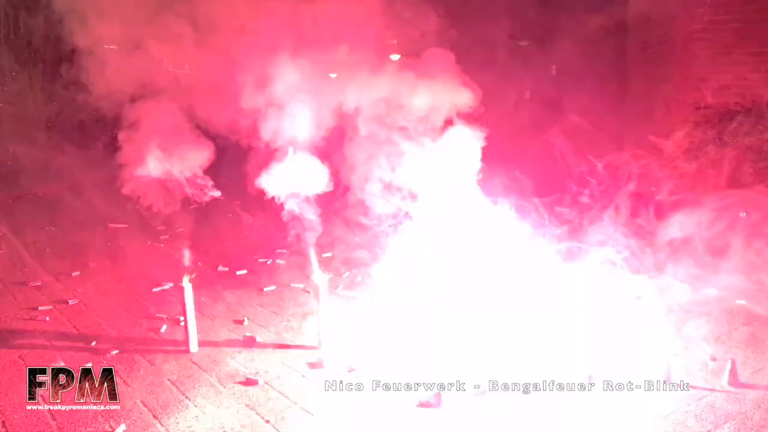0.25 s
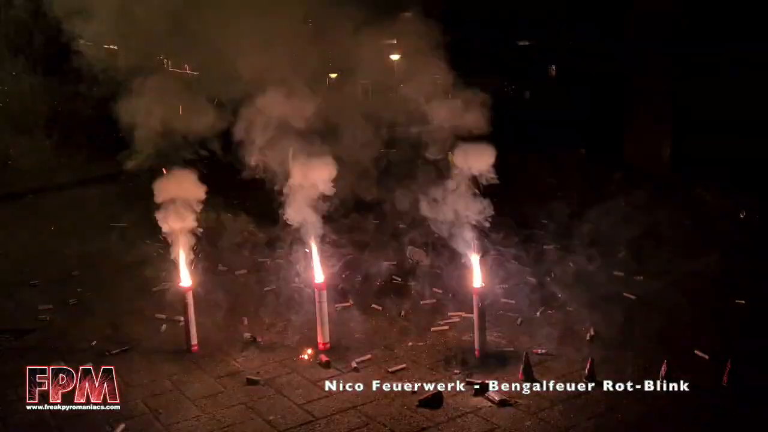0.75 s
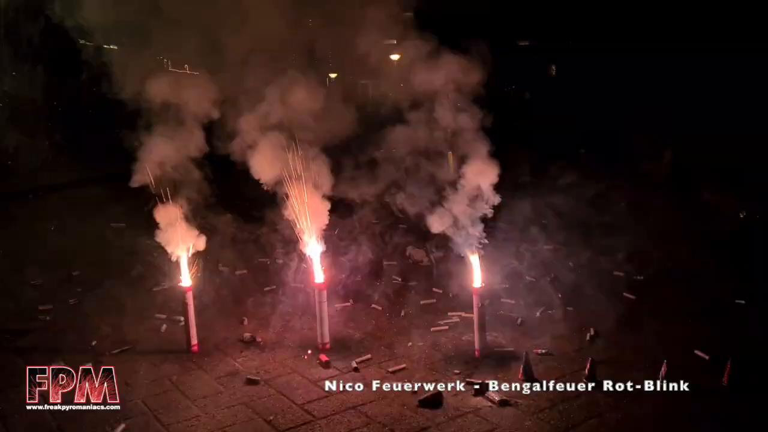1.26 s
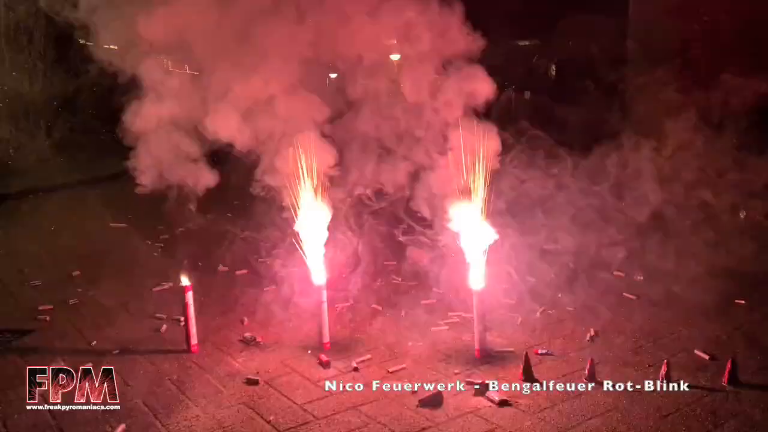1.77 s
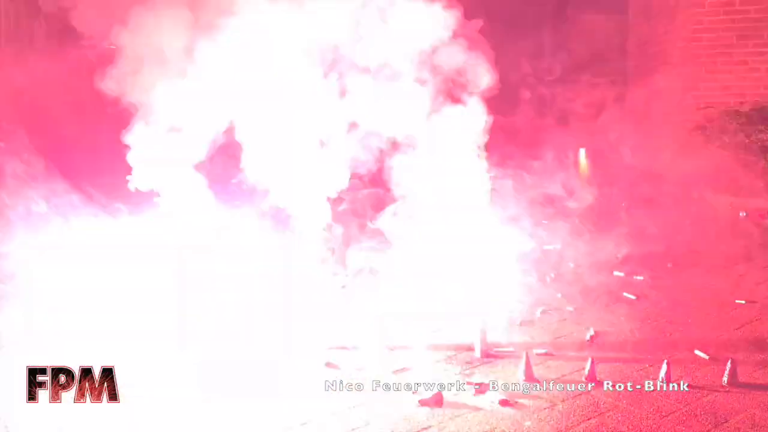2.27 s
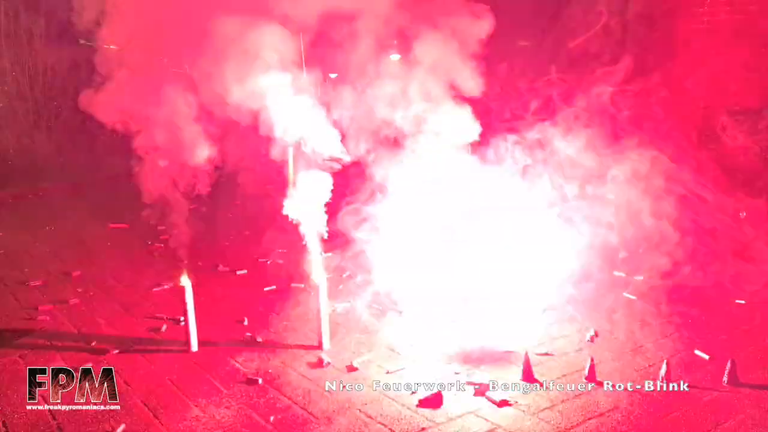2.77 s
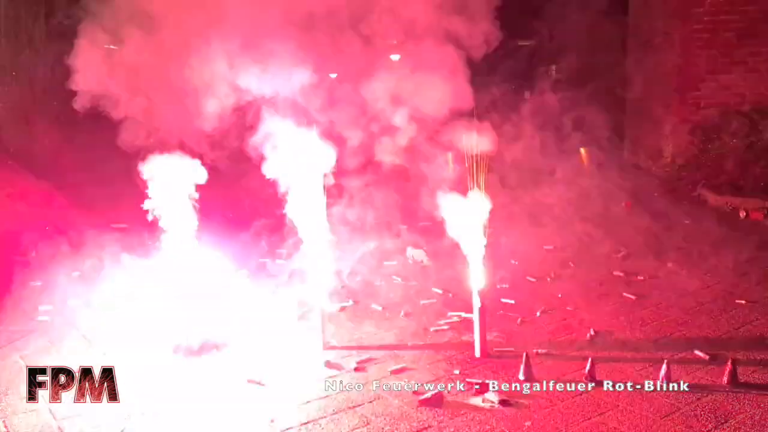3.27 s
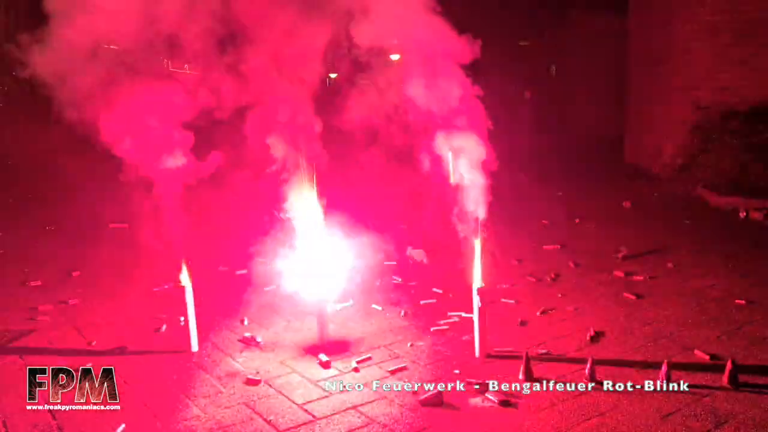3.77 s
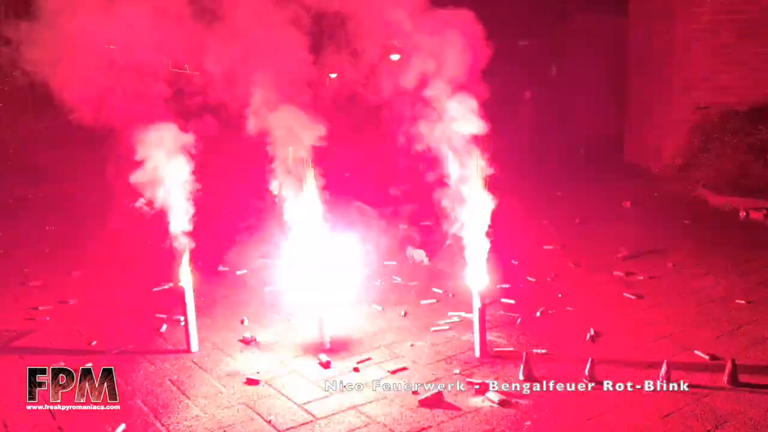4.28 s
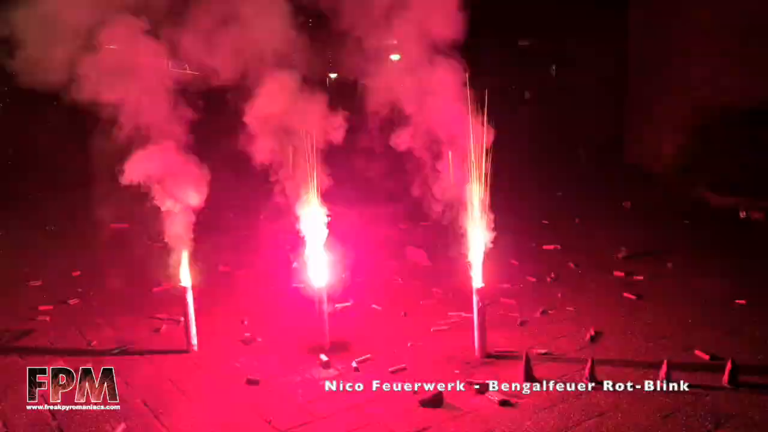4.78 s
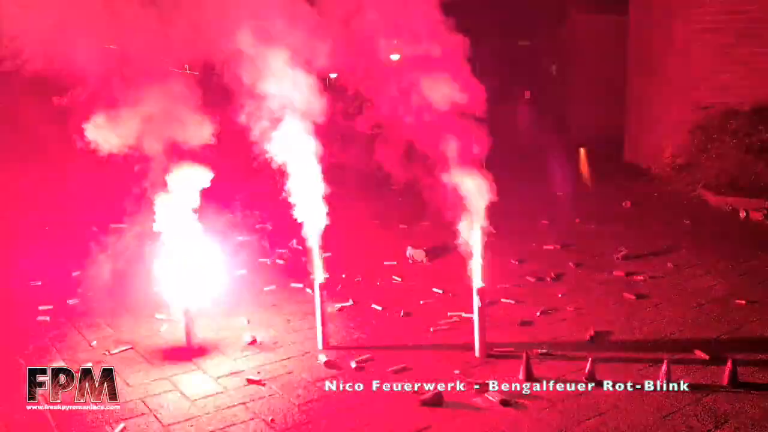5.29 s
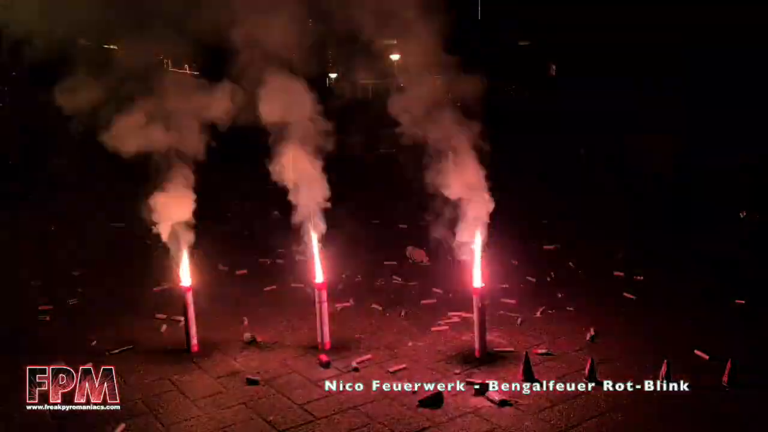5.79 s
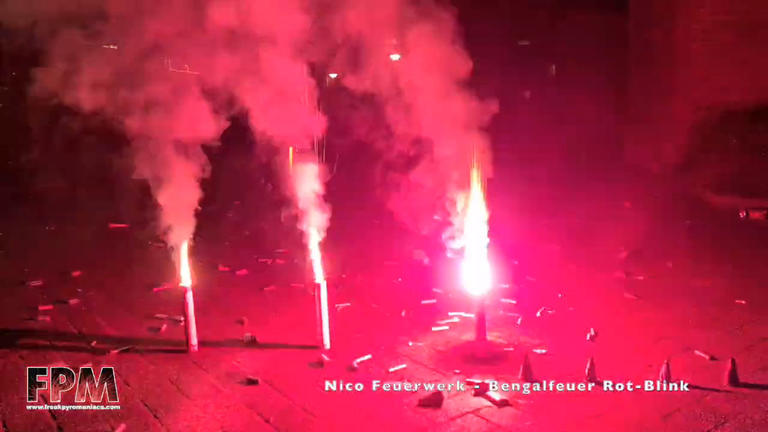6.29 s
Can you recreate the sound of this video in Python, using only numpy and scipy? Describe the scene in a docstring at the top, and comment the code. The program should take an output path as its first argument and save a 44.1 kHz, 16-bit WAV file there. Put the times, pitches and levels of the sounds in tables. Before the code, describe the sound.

Three flares sputter and crackle in a paved yard, flashing in rapid, irregular bright fizzing whooshes while distant fireworks boom over low rumble.

```python
"""A paved yard at night: three strobe flares burn side by side a few metres from a stereo microphone.
Each smoulders with a faint sputter and crackle, made of noise with wavering level and of short noise ticks.
Two to four times a second each flashes: roar, hiss and spark-filled fizz swell briefly, with a puff of air.
The sound bounces off the paving and dies quickly in the yard; soft thuds are low noise bursts.
Distant fireworks boom as narrow noise bands with echoes, over a low town rumble of coloured noise."""
import sys
import numpy as np
from scipy import signal
from scipy.fft import rfft, irfft, next_fast_len
from scipy.io import wavfile
from scipy.ndimage import uniform_filter1d

SR = 44100
rng = np.random.default_rng(int(sys.argv[2]) if len(sys.argv) > 2 else 0)


def waveform_to_disk(signal):
    """Save audio, clipped to [-1, 1], as 16-bit WAV at the path in sys.argv[1]."""
    frames = np.transpose(np.atleast_2d(signal))
    scaled = np.clip(frames, -1, 1) * 32767
    samples = np.round(scaled).astype(np.int16)
    wavfile.write(sys.argv[1], SR, samples)


N = 288414
TIME = np.arange(N) / SR
SIZE = next_fast_len(N + SR // 2)
FREQ = np.arange(SIZE // 2 + 1) * SR / SIZE
MIRROR = np.array([[1], [-1]])  # left, right
FADE_S = 0.015  # every flash dies away equally fast


def undb(db):
    """Decibels to gain."""
    return 10 ** (np.asarray(db) / 20)


def unit(x):
    """Scale to rms 1."""
    return x / np.sqrt(np.mean(x ** 2))


def curve(rows):
    """Rows (s, value) joined by straight lines over time."""
    return np.interp(TIME, *np.transpose(rows))


def spectrum(points):
    """Rows (Hz, dB) joined on a log-frequency axis."""
    hz, db = np.transpose(points)
    return np.interp(np.log(FREQ + 1), np.log(hz), db)


def shape(x, response):
    """Filter with a frequency response."""
    return irfft(rfft(x, SIZE) * response, SIZE)[..., :N]


def colour(x, points):
    """Give a sound a spectrum that runs to low levels outside its points; rms 1."""
    below = (points[0][0] / 2, -60)
    above = (points[-1][0] * 2, -70)
    return unit(shape(x, undb(spectrum([below] + list(points) + [above]))))


def walk(rate_hz):
    """Smooth random signal, rms 1, with a Gaussian lowpass at rate_hz."""
    return unit(shape(rng.standard_normal(N), np.exp(-(FREQ / rate_hz) ** 2)))


def sparks(rate_hz, spread_db):
    """Single-sample cracks at random moments, some louder than the rest; rms 1."""
    size = undb(spread_db * np.minimum(rng.exponential(size=N), 2.5))
    hit = rng.random(N) < rate_hz / SR
    return unit(hit * size * np.sign(rng.standard_normal(N)))


def diffuse(mid, side, wide_hz):
    """Far sound: the bass is alike at both ports, the treble is not."""
    return mid + shape(side, FREQ / np.hypot(FREQ, wide_hz)) * MIRROR


def town(waver_db=0.5, waver_hz=5.7):
    """Low town rumble: coloured noise, swelling around the loudest bang."""
    # rumble spectrum: (frequency [Hz], level [dB])
    rumble_points = [(20, 9), (40, -10), (70, 9), (120, 1.5), (250, -1.5), (450, -3.5), (640, -7),
                     (1000, -17.5), (2000, -26), (6000, -68)]
    # rumble level: (time [s], level [dB])
    level_rows = [(0, -44), (1.4, -49), (2.5, -54), (3.9, -47.5), (4.5, -42.5), (6.5, -46)]
    level = undb(curve(level_rows) + waver_db * walk(waver_hz))
    mid, side = colour(rng.standard_normal((2, N)), rumble_points) * level
    return diffuse(mid, side, wide_hz=875)


def booms(rise_s=0.0021, cycles=3.1, usual_hz=200, width_share=1.09, width_growth=0.24,
          echo_db=-17, echo_s=0.25, echo_growth=0.62, crack_db=-15, crack_hz=640):
    """Far bangs smeared by the streets: deep ones are narrower and echo longer, bright ones keep some crack."""
    # distant fireworks: (start [s], level [dB], centre frequency [Hz])
    bangs = [(.076, -35, 700), (0.485, -28.5, 63.6), (.553, -25.5, 66.4), (.677, -26, 56.3),
             (.718, -30, 62.4), (0.811, -28, 71.4), (.96, -34.5, 69.5), (1.11, -37.5, 70),
             (2.749, -35.5, 218), (2.819, -35, 270), (3.503, -30, 400), (3.54, -31, 450),
             (3.978, -25.5, 193), (4.005, -23, 218), (4.022, -21, 420), (4.044, -17.5, 433),
             (4.092, -22, 241), (4.113, -18.5, 182), (4.172, -28, 346)]
    out, age = np.zeros((2, N)), TIME[:SR]
    crack_edges = [crack_hz / 2, crack_hz * np.sqrt(2)]
    crack_band = signal.butter(2, crack_edges, "band", fs=SR, output="sos")
    for start, db, hz in bangs:
        pitch = hz / usual_hz
        width_hz = hz * width_share * pitch ** width_growth
        edges = np.hypot(hz, width_hz / 2) + np.array([-width_hz, width_hz]) / 2
        band = signal.butter(2, edges, "band", fs=SR, output="sos")
        wave = signal.hilbert(signal.sosfilt(band, rng.standard_normal((2, 2 * SR))))
        even = wave.real / abs(wave)  # one pressure front: its strength is even
        rumble = unit(signal.sosfilt(band, even)[:, SR:])
        crack = unit(signal.sosfilt(crack_band, rng.standard_normal((2, SR))))
        crack *= undb(crack_db) * min(pitch, 1) ** 2
        echoes = undb(echo_db) * np.exp(-age / echo_s * pitch ** echo_growth)
        swell = (1 - np.exp(-age / rise_s)) * (np.exp(-age * hz / cycles) + echoes)
        first = int(start * SR)
        out[:, first:first + SR] += undb(db) * (rumble + crack) * swell
    return diffuse(*out, wide_hz=750)


def crackle(crackle_db=-57, decay_s=0.0011):
    """Glowing slag cracks about a dozen times a second, each time a dry tick of a few milliseconds."""
    # tick spectrum: (frequency [Hz], level [dB])
    tick_points = [(600, -5), (1600, 3), (4500, -8), (7000, 16), (15000, -22)]
    age = TIME[:SR // 50]
    tick = rng.standard_normal(len(age)) * np.exp(-age / decay_s)
    cracks = sparks(rate_hz=12, spread_db=4)
    return undb(crackle_db) * colour(shape(cracks, rfft(tick, SIZE)), tick_points)


def pops(rise_s=0.004, decay_s=0.024):
    """Soft thuds as a charge goes off: a sudden shove of gas, low and alike at both ports."""
    # thuds: (start [s], level [dB])
    thuds = [(1.97, -34), (2.235, -39), (2.988, -30.5)]
    # thud spectrum: (frequency [Hz], level [dB])
    thud_points = [(35, -4), (65, 5), (125, -4), (190, -9), (500, -15)]
    level = np.zeros(N)
    for start, db in thuds:
        age = np.maximum(TIME - start, 0)
        level += undb(db) * (1 - np.exp(-age / rise_s)) * np.exp(-age / decay_s)
    return level * colour(rng.standard_normal(N), thud_points)


def burn(age, swell_s, ignition=2.43, catch=0.47, roar_bend=1.42, hiss_bend=1.3, fizz_bend=0.81,
         fade_bend=1.61):
    """Power of one flash in roar, hiss and fizz: sparks come first, then the flame builds and dies."""
    # a quick flash also catches more abruptly
    lit = np.clip((age / swell_s + ignition) / catch + 0.5, 0, 1) ** 2
    rising = age < 0
    bend = np.where(rising, np.array([[roar_bend], [hiss_bend], [fizz_bend]]), fade_bend)
    return lit * np.exp(-abs(age / np.where(rising, swell_s, FADE_S)) ** bend)


def eddies(gas, patchy_db=3.0, size=512):
    """Eddies brighten and dull narrow parts of the jet's spectrum for a few hundredths of a second."""
    frames = signal.stft(gas, nperseg=size)[2]
    swirl = uniform_filter1d(rng.standard_normal(frames.shape), size=6, axis=0)
    swirl = unit(uniform_filter1d(swirl, size=6, axis=1))
    return signal.istft(frames * undb(patchy_db * swirl), nperseg=size)[1][:N]


def flare(flashes, roar_db, roar_drift, fizz_db, fizz_drift, hiss_db=-1.0, puff_db=-19.5,
          smoulder_roar_db=-6, smoulder_fizz_db=-4, sputter_db=6, spark_db=-7, usual_length_s=0.032):
    """One jet: flashes over a sputtering glow drive roar, hiss, fizz and a puff of air; drifts in dB/s."""
    # smouldering between flashes, before the part trims: (time [s], level [dB])
    smoulder = [(0, -55.5), (3.4, -57), (4.3, -52), (6.5, -50.5)]
    # flame roar spectrum: (frequency [Hz], level [dB])
    roar_points = [(60, -6), (300, -7.5), (600, -4), (950, -13.5), (1450, 0), (2100, -1), (2900, -2),
                   (3800, -9.5)]
    # gas hiss spectrum: (frequency [Hz], level [dB])
    hiss_points = [(2200, -53), (3200, -3.5), (4100, 5), (5400, 4.5), (6700, 2), (7500, -6), (9000, -50)]
    # spark fizz spectrum: (frequency [Hz], level [dB])
    fizz_points = [(6300, 1.6), (7500, 4.8), (8300, 9.1), (9600, 8.5), (11000, 3.7), (12200, 8.1),
                   (15000, 11), (16000, 8.3)]
    # low push of air from a flash: (frequency [Hz], level [dB])
    puff_points = [(30, -4), (65, 14), (130, -24), (260, -5.5), (600, -23), (1100, -54), (1700, 5.5)]

    sputter = 2 * np.tanh(walk(49) / 2)  # limited to +-2
    glow = undb(curve(smoulder) + sputter_db * sputter)
    power = (undb([[smoulder_roar_db], [0], [smoulder_fizz_db]]) * glow) ** 2
    push = np.zeros(N)
    for peak, _, db, swell_s in flashes:
        first = max(int((peak - 4 * swell_s) * SR), 0)
        near = slice(first, int((peak + 6 * FADE_S) * SR))
        # burning down: more roar, less fizz
        tone = np.array([[roar_db + roar_drift * peak], [hiss_db], [fizz_db + fizz_drift * peak]])
        flash = undb(db + tone) ** 2 * burn(TIME[near] - peak, swell_s)
        power[:, near] += flash
        # a quick flash full of sparks shoves the air hardest
        push[near] += flash[2] * (usual_length_s / (swell_s + FADE_S)) ** 2

    # turbulent gas with bursting grains of the charge in it
    gas = eddies(rng.standard_normal(N)) + undb(spark_db) * sparks(rate_hz=1400, spread_db=5.0)
    parts = np.array([colour(gas, points) for points in (roar_points, hiss_points, fizz_points)])
    jet = (np.sqrt(power) * parts).sum(axis=0)
    puff = undb(puff_db) * np.sqrt(push) * colour(gas, puff_points)
    flutter = undb(walk(70))  # 1 dB rms
    return (jet + puff) * flutter


def path(jet, lag_s, bounce_s, paving=0.38, scatter_hz=9000):
    """Direct sound plus its bounce off the paving, a comb; the two ports hear it at different times."""
    reflection = paving / (1 + (FREQ / scatter_hz) ** 2)  # rough stones scatter the treble
    comb = 1 + reflection * np.exp(-2j * np.pi * FREQ * bounce_s)
    comb /= np.sqrt(1 + reflection ** 2)
    return shape(jet, comb * np.exp(-1j * np.pi * FREQ * lag_s * MIRROR))


def yard(jet, t60_s=0.17, first_wall_s=0.0065, wet_db=-6.0, dull_hz=13000):
    """A short diffuse tail from walls and ground: decaying noise, unrelated at the two ports."""
    age = TIME[:SR // 2]
    decay = np.exp(-np.log(1000) * age / t60_s) * (age > first_wall_s)
    tail = rng.standard_normal((2, len(age))) * decay
    tail /= np.sqrt(np.sum(tail ** 2, axis=1, keepdims=True))
    tone = FREQ / (FREQ + 300) / np.sqrt(1 + (FREQ / dull_hz) ** 2)
    return undb(wet_db) * shape(jet, rfft(tail, SIZE) * tone)


def scene(direct_db=0.5):
    """Three flares, each with its own reflections in the yard, and the town behind."""
    # flashes: (peak [s], flare [0 left, 1 middle, 2 right], level before part trims [dB], swell [s])
    flash_rows = [(0.246,2,-25,0.012), (0.268,1,-27.5,0.01), (0.517,2,-24.5,0.0081), (0.562,1,-26.5,0.03),
                  (0.67,0,-44.5,0.082), (0.764,0,-31.5,0.012), (0.807,2,-27.5,0.025), (0.896,1,-27,0.02),
                  (1.098,2,-26.5,0.015), (1.175,1,-25.5,0.033), (1.301,2,-41,0.022), (1.422,2,-25,0.022),
                  (1.639,1,-38.5,0.029), (1.693,2,-26.5,0.02), (1.843,0,-30,0.015), (1.954,2,-33,0.02),
                  (1.978,2,-28,0.006), (2.099,1,-25.5,0.016), (2.24,0,-25,0.017), (2.349,1,-27.5,0.035),
                  (2.474,2,-29,0.019), (2.66,1,-26.5,0.012), (2.728,2,-30,0.034), (2.967,2,-25.5,0.017),
                  (2.995,0,-25,0.01), (3.134,1,-40,0.046), (3.233,2,-28,0.029), (3.296,0,-28.5,0.015),
                  (3.461,2,-29,0.016), (3.516,1,-29.5,0.038), (3.625,2,-31,0.0062), (3.743,1,-30,0.048),
                  (3.849,2,-31.5,0.03), (3.882,0,-26,0.01), (4.042,2,-29.5,0.016), (4.085,0,-32.5,0.05),
                  (4.177,0,-35.5,0.023), (4.272,1,-27,0.032), (4.416,0,-28.5,0.015), (4.511,2,-29,0.021),
                  (4.669,0,-30,0.023), (4.747,1,-27,0.033), (4.869,1,-41.5,0.014), (4.962,2,-28.5,0.02),
                  (5.155,0,-27,0.013), (5.205,2,-27.5,0.012), (5.272,0,-31.5,0.02), (5.368,0,-36,0.0092),
                  (5.433,2,-27.5,0.017), (5.642,0,-29.5,0.02), (5.663,1,-24.5,0.012), (5.865,2,-32,0.02),
                  (5.92,0,-26,0.012), (6.069,2,-32.5,0.0086), (6.169,0,-31,0.014), (6.209,1,-27.5,0.016),
                  (6.254,2,-32.5,0.012), (6.414,0,-29.5,0.019), (6.468,1,-24,0.015)]
    # flares, left to right: (left port lag [s], paving bounce delay [s],
    # roar trim [dB], its drift [dB/s], fizz trim [dB], its drift [dB/s])
    flare_rows = [(-.000163, .000465, -3.5, 0.36, 2, -0.5), (-.000080, 0.00047, -8, 0.89, -1.5, -1.8),
                  (.000040, .000492, -7, 1.435, -2, -0.57)]
    out = town() + booms()
    for k, (lag_s, bounce_s, *tone) in enumerate(flare_rows):
        flashes = [row for row in flash_rows if round(row[1]) == k]
        jet = flare(flashes, *tone) + crackle()
        out = out + undb(direct_db) * path(jet, lag_s, bounce_s) + yard(jet)
    return out + pops()


def record(dry, thin_hz=10400, thin_width_hz=850, thin_db=-18, top_hz=15850):
    """Each port colours the sound in its own way; the top is cut."""
    # the two ports face different ways: (frequency [Hz], left minus right [dB])
    port_points = [(100, -.5), (600, -0.5), (1400, 0.5), (2700, -3.5), (3300, -1), (4900, -7), (6300, -4),
                   (7200, -1), (8100, 14), (9300, 3), (11000, -2), (12200, -8.5), (14000, -2.5)]
    ports = undb(spectrum(port_points) / 2 * MIRROR)
    left, right = shape(dry, ports / np.sqrt(np.mean(ports ** 2, axis=0)))
    # around thin_hz little is left of what both channels share
    thinning = undb(thin_db * np.exp(-((FREQ - thin_hz) / thin_width_hz) ** 2))
    mid = shape((left + right) / 2, thinning)
    heard = mid + (left - right) / 2 * MIRROR
    return signal.sosfilt(signal.ellip(10, 0.2, 80, top_hz, fs=SR, output="sos"), heard)


dry = scene()
out = record(dry)
waveform_to_disk(out)
```